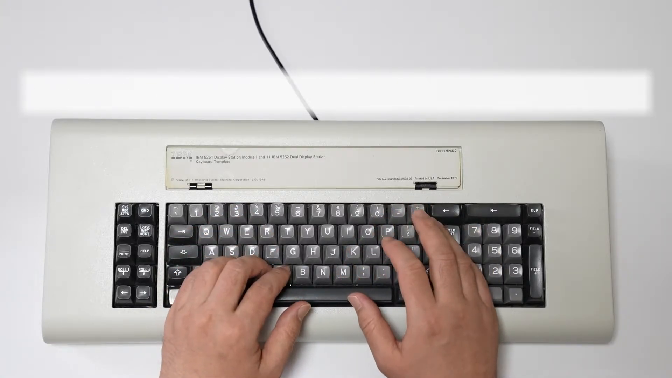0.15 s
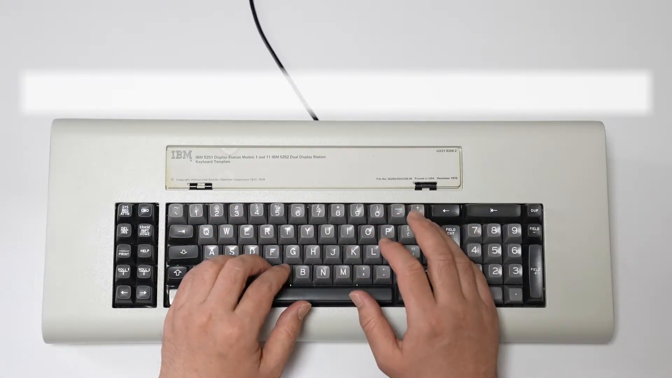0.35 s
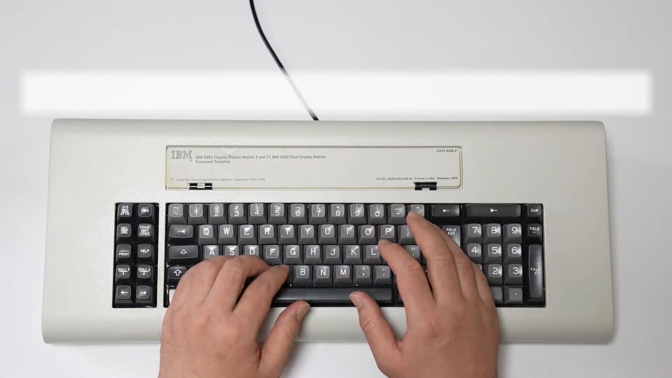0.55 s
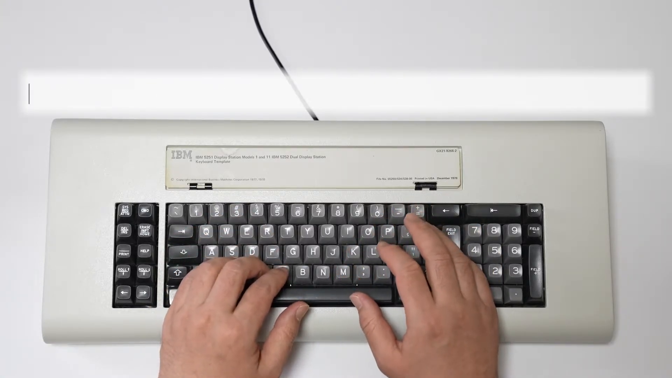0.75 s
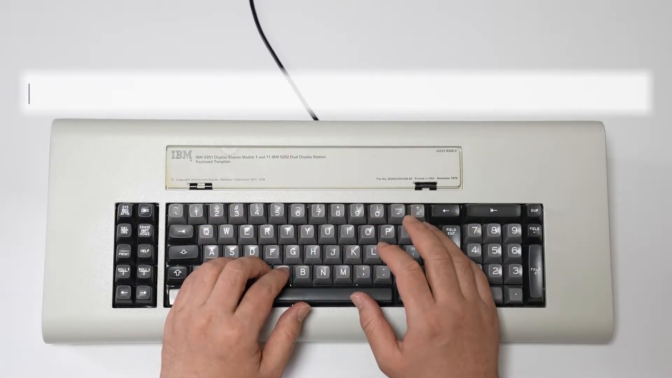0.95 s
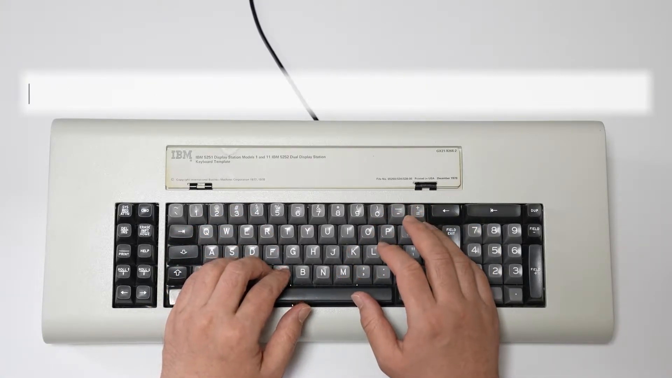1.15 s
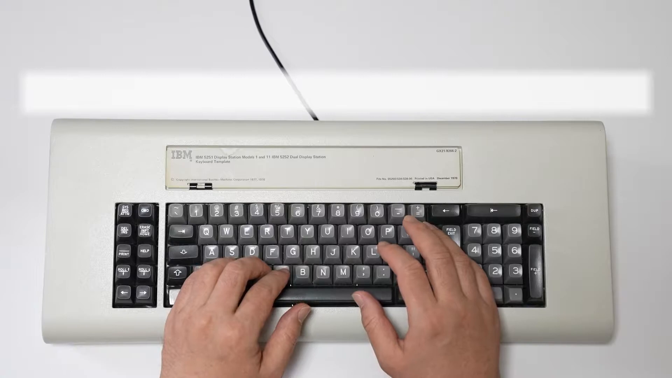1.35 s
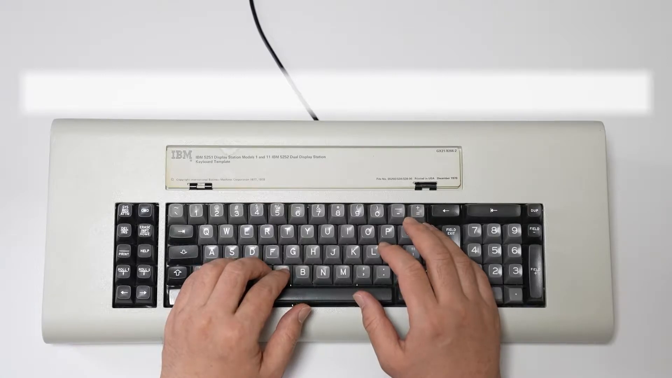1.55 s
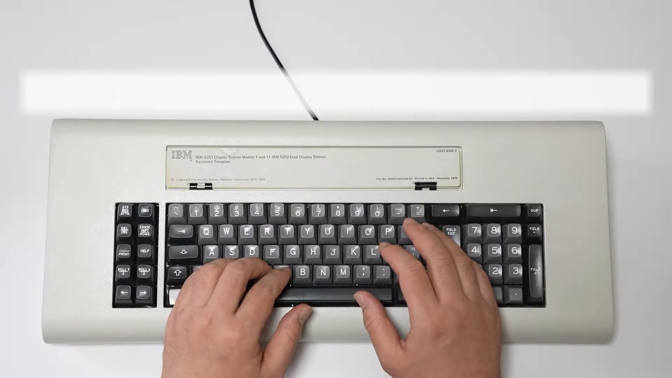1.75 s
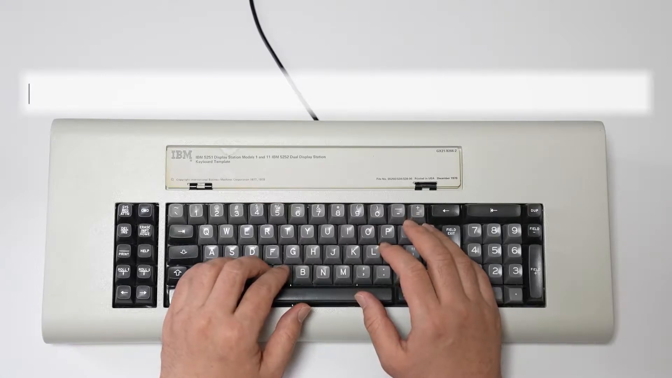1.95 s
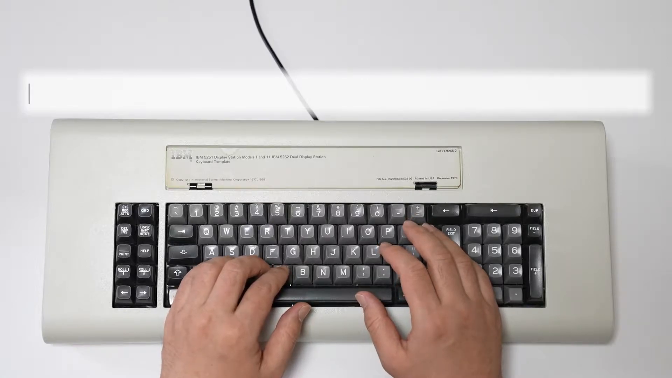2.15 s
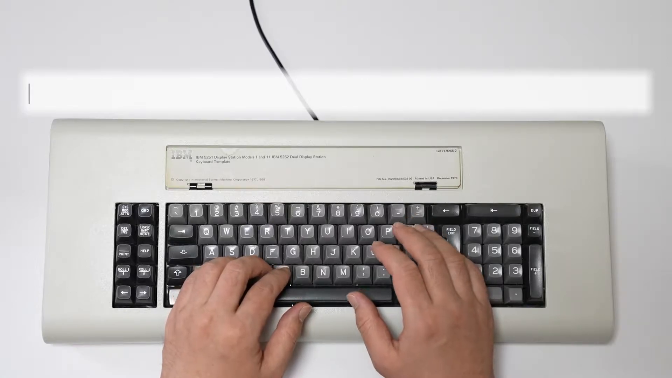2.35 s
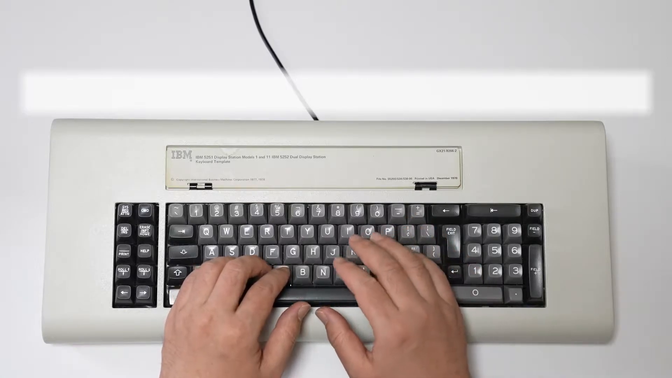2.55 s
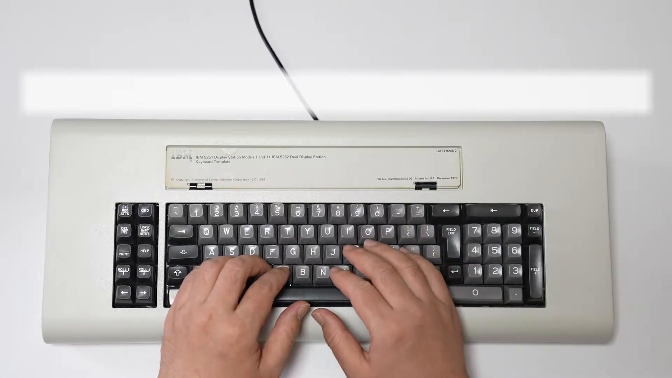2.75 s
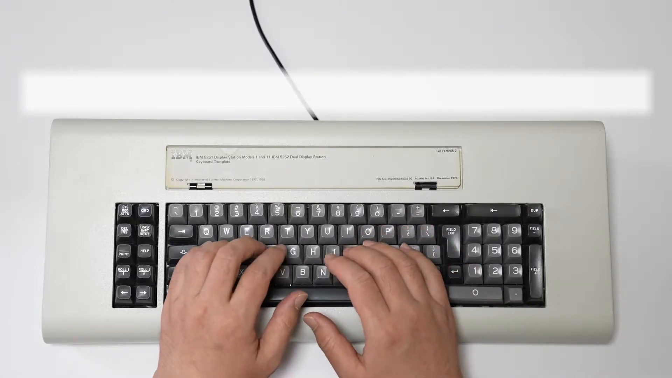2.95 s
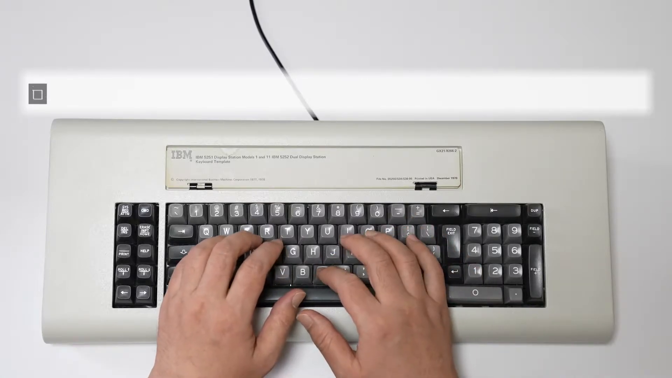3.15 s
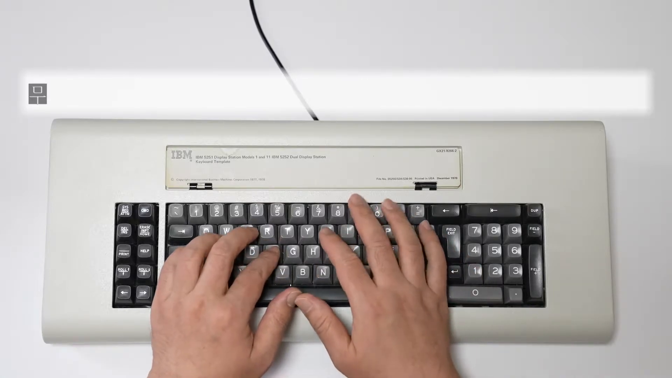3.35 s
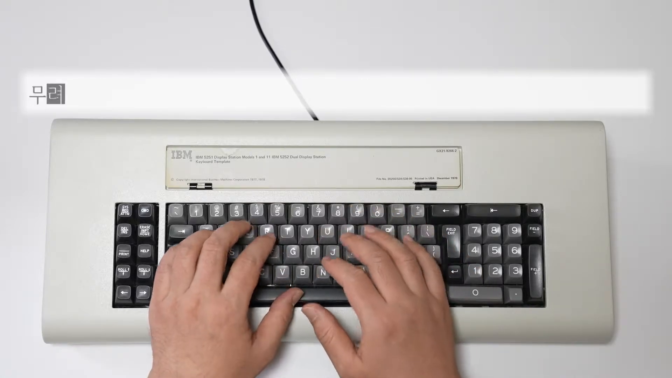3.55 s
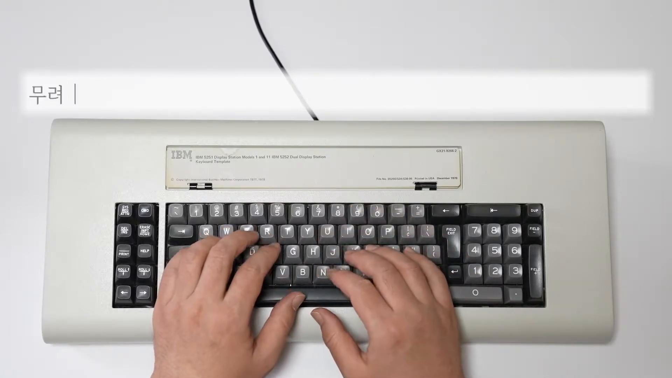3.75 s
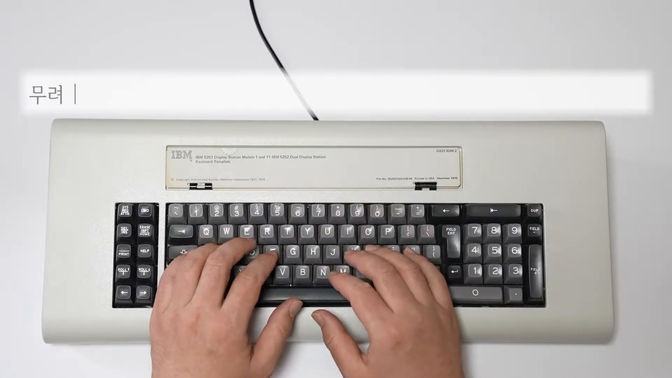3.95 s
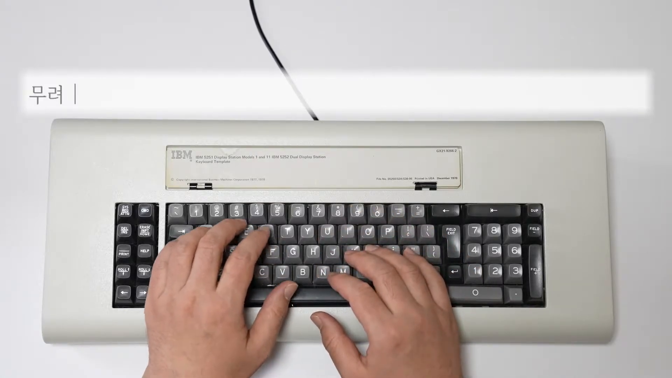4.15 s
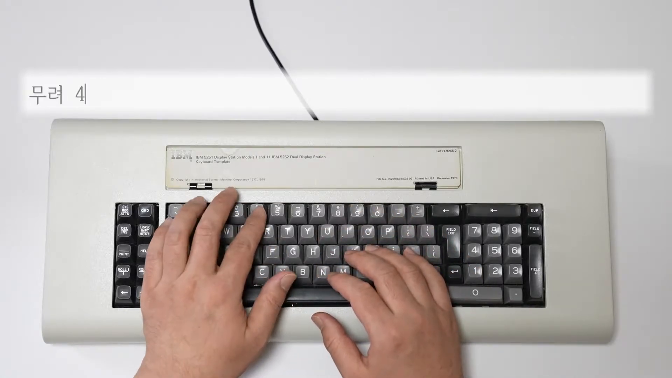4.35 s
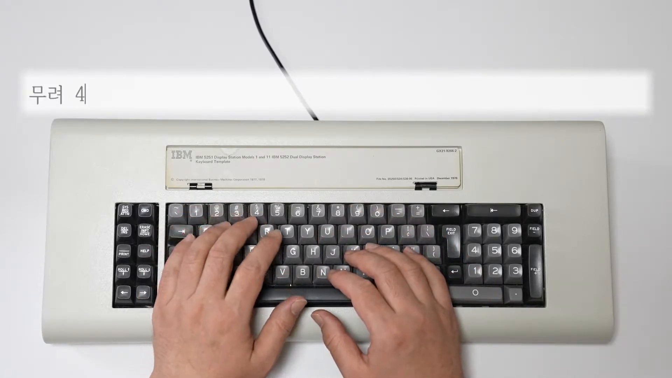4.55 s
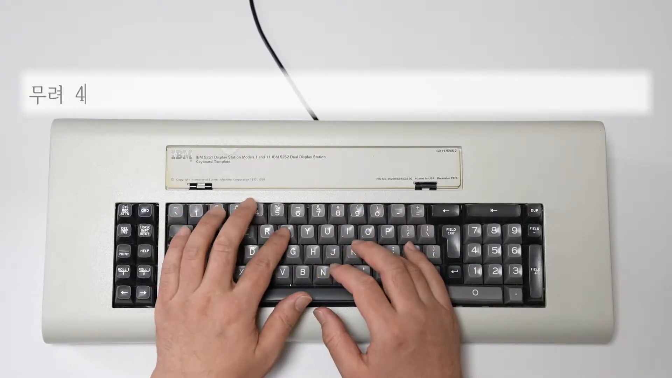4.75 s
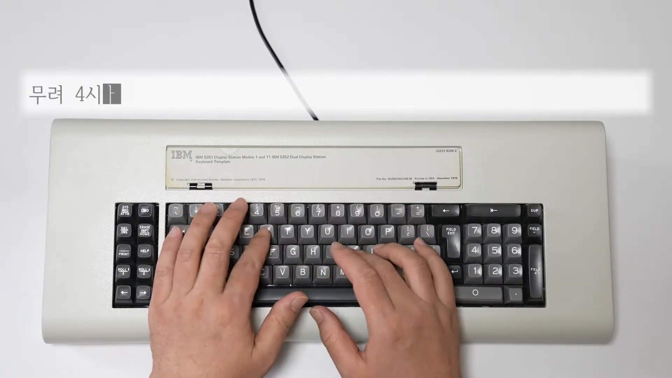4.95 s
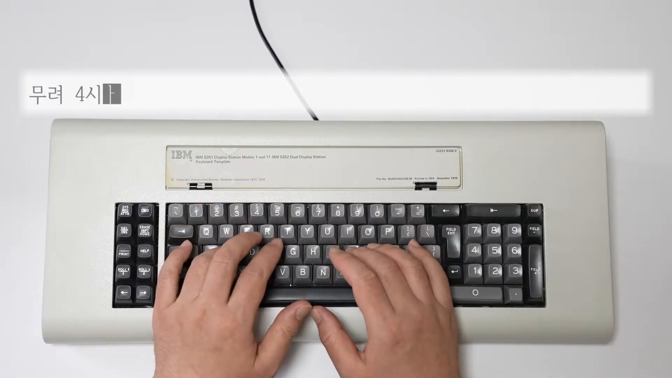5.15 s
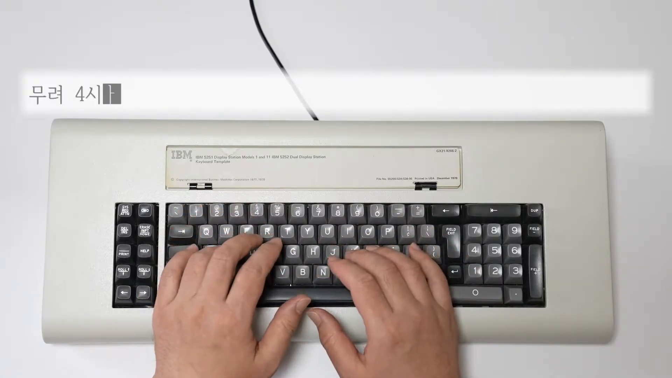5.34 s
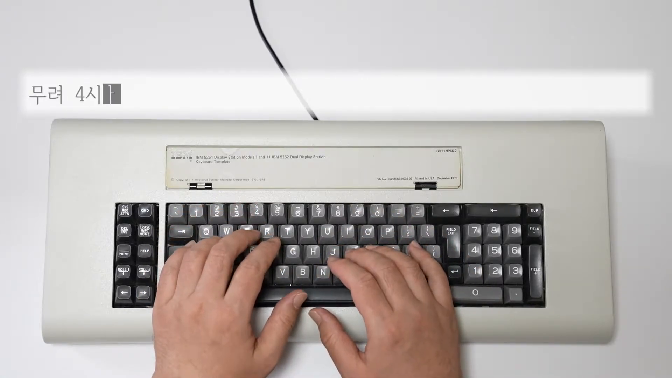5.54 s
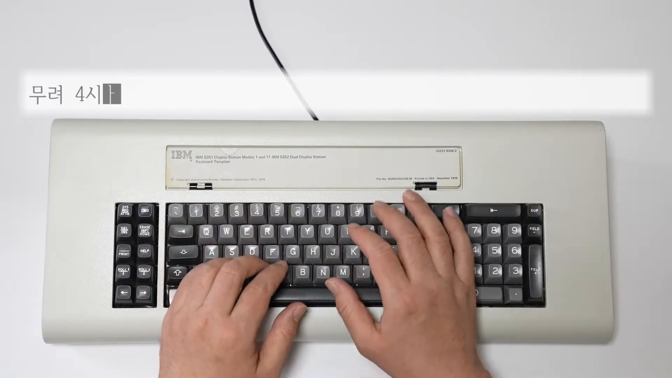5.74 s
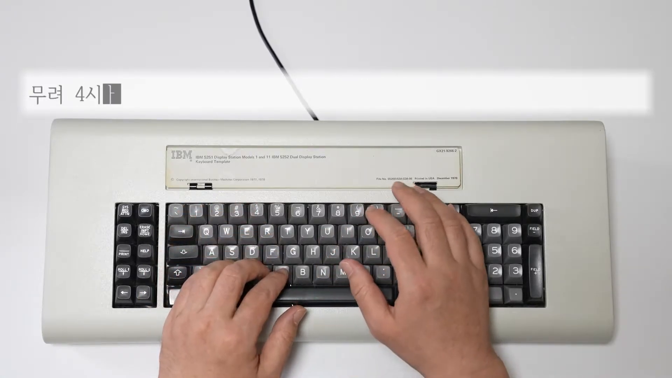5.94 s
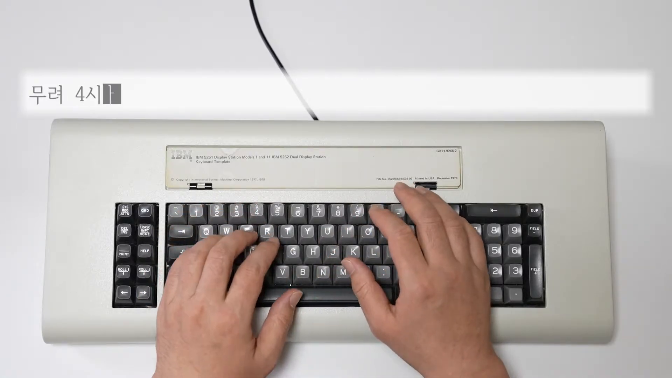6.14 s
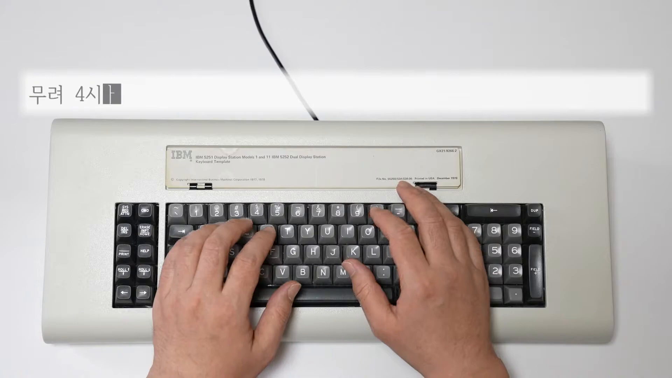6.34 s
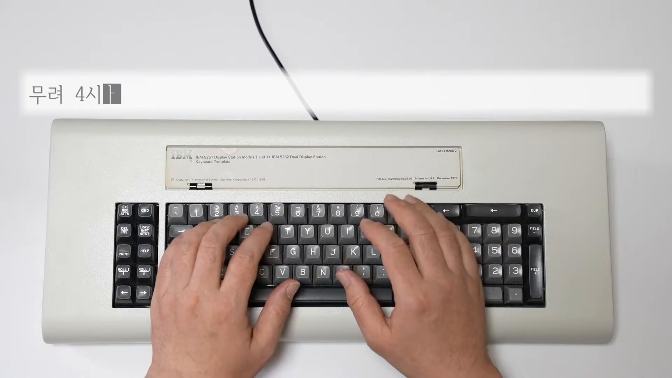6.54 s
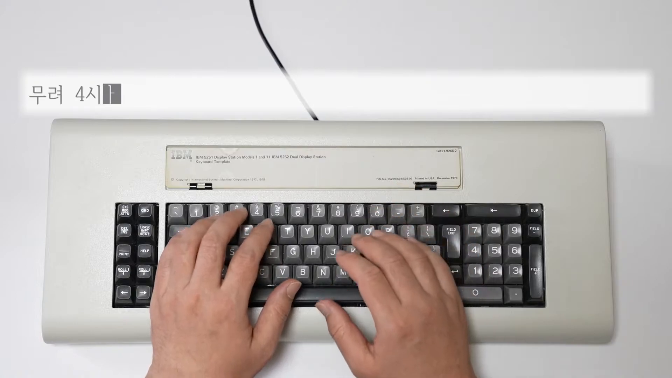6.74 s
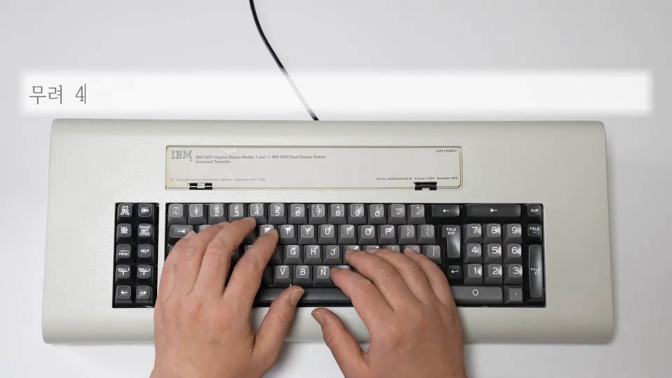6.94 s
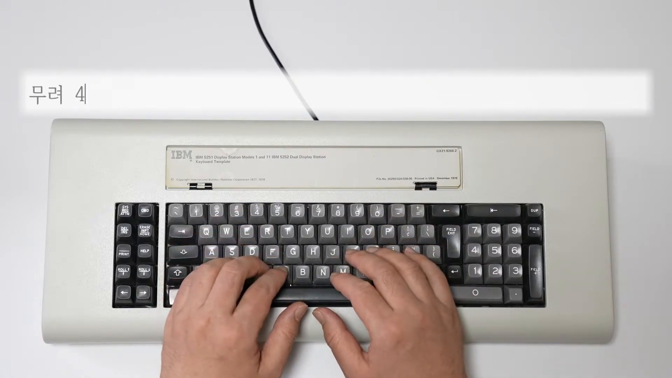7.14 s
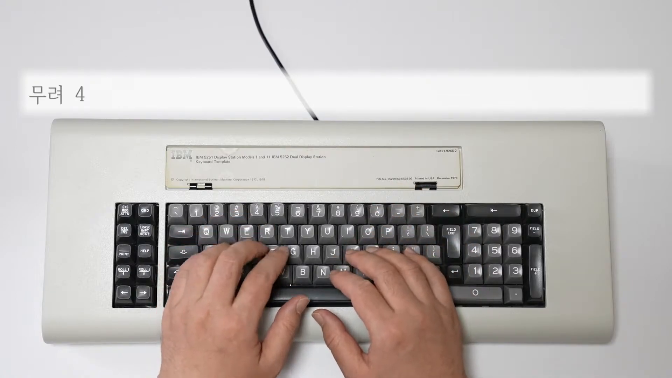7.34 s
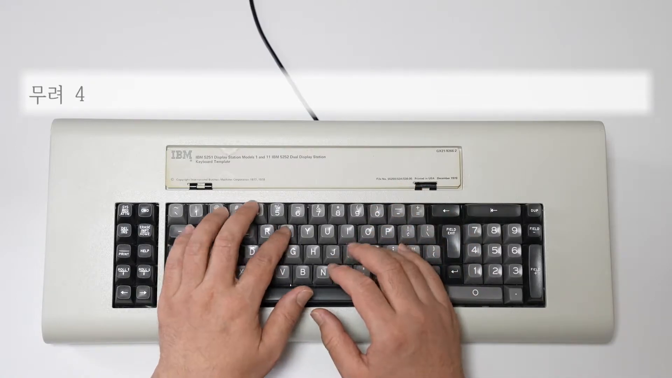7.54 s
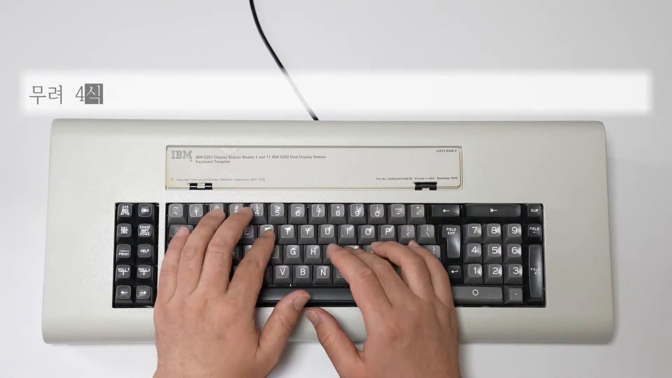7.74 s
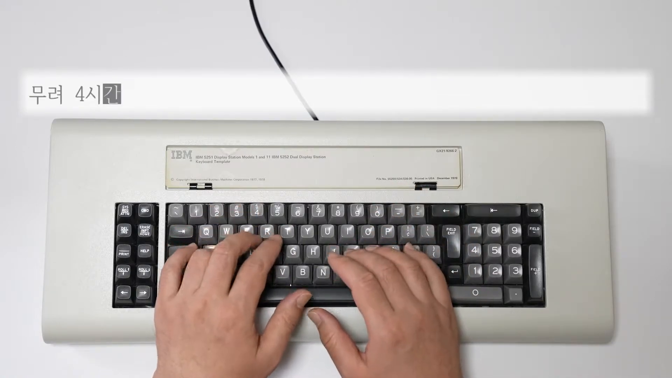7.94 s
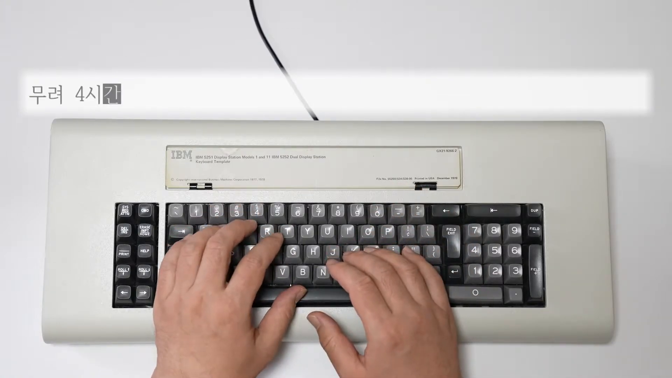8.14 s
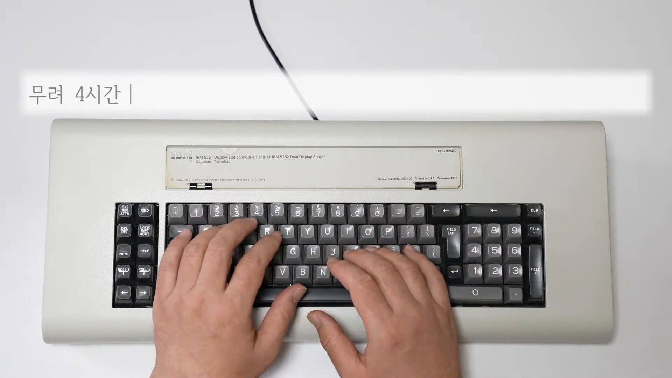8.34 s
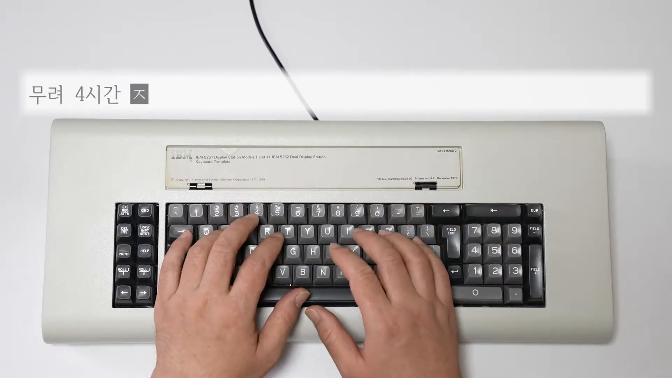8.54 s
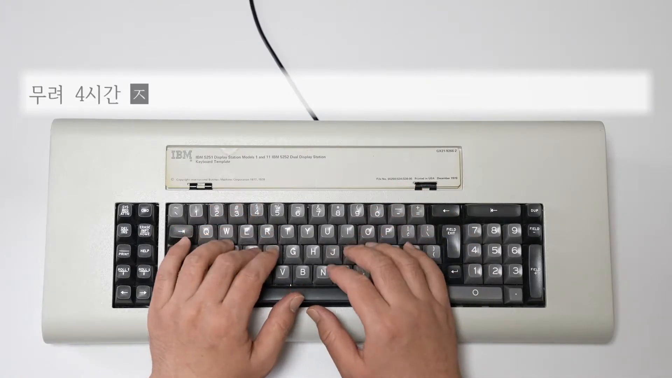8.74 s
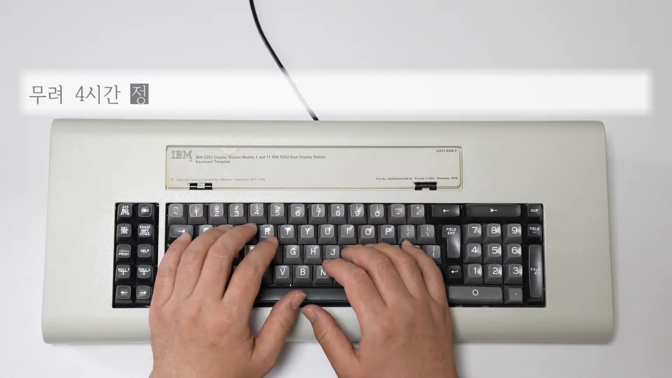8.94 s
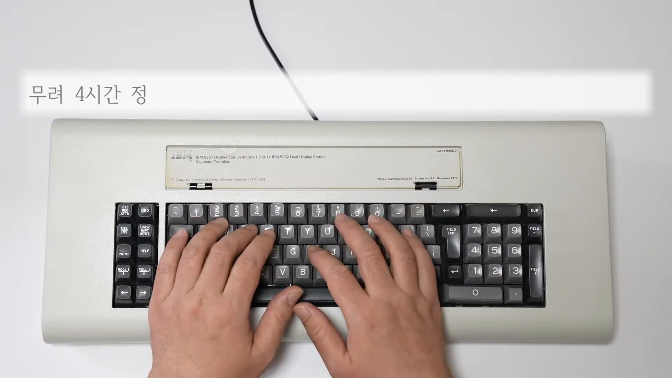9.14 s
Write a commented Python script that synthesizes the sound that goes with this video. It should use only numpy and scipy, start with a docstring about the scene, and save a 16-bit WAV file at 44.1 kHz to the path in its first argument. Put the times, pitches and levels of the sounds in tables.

```python
"""From the start a fan hisses and hums in a small quiet room, built from bands of noise and steady tones.
Distant engines drone outside: low tones with overtones that swell and fade at their own times.
Soon a heavy spring keyboard gives a first few knocks, each a rattle of tiny impacts ringing the case.
Some leave a thin spring tone ringing, and the desk and walls answer with a short tail of noise.
After a pause the typing returns in bursts, and a few heavy landings also rock the case in low tones."""
import sys
import numpy as np
from scipy import signal
from scipy.fft import rfft, irfft
from scipy.io import wavfile

SR = 44100
rng = np.random.default_rng(int(sys.argv[2]) if len(sys.argv) > 2 else 0)


def volts_from_decibels(level):
    """Turn decibel levels (scalar or array-like) into linear amplitude factors."""
    exponent = np.asarray(level, float) / 20
    return 10 ** exponent


def persist_wave(psi):
    """Save psi, clipped to +-1, as 16-bit WAV."""
    counts = np.round(np.clip(psi, -1, 1) * 32767).astype(np.int16)
    wavfile.write(sys.argv[1], SR, np.atleast_2d(counts).T)


N = 409688   # length in samples

# spectrum of the fan and outdoor hiss, before its overall level: pitch_hz, level_db (per Hz)
HISS_SPECTRUM = [(15, -32), (25, 1), (52, -6.5), (85, -10.5), (124, -13.5), (177, -15.5), (229, -13.5),
                 (404, -19), (763, -19.5), (839, -16.5), (1410, -27.5), (1660, -18), (2200, -28.5),
                 (3220, -38), (7000, -49.5), (9100, -63), (15400, -120)]
# overall loudness of the hiss: time_s, level_db
HISS_LEVEL = [(0, -48), (2.3, -46.5), (3, -46.5), (4.5, -47.5), (7, -49), (9.29, -48)]
# how alike the hiss is at left and right: pitch_hz, likeness (-1 opposite to 1 equal)
HISS_LIKENESS = [(60, -0.47), (240, 0.18), (950, 0.28), (3770, 0.43), (15000, 0.84)]
# mains hum tones, each level before its waver: pitch_hz, level_db
HUM_TONES = [(120, -64.5), (240, -69.5), (360, -68)]
# distant engines, before drift and overtone levels: loudest_s, pitch_hz, level_db,
# half_length_s (time from the loudest point down to 37 percent)
ENGINES = [(1.2, 43.95, -53, 2), (5.505, 58.5, -53.5, 1), (6.5, 38.02, -61, 3.6), (8.65, 59.6, -59.5, 0.48)]
# levels of the first three multiples of an engine's pitch: level_db
OVERTONE_DB = [1.5, -13.5, -14]
# contacts of key, spring and plate: start_s, strength_db, hardness_db (per step of TILT),
# plate_over_cap_db (per step of PLATE), loudest_ring_hz
CONTACTS = [(0.1435, -34, 0.3, 3.5, 1277), (0.1609, -46.5, 3.5, -5.5, 1280.0),
            (0.2128, -57.0, -4.9, 2, 860.0), (0.2804, -34.5, 0.7, -1.1, 2830),
            (3.0574, -44.5, -6, 1.2, 432), (3.082, -34, 2, 1, 1180), (3.1585, -45, -5, -4, 1250),
            (3.1731, -33, 2, 1, 1260), (3.2075, -33.5, -0.5, 0.5, 3120.0),
            (3.2494, -31, -1.7, -0.5, 2100.0), (3.2938, -64, -2.3, -4, 960.0), (3.324, -40.5, 6, 2.5, 826),
            (3.338, -31.5, 1.6, 0, 1233), (3.4215, -29.5, -2, -1.7, 436), (3.4543, -35, 2, 0.5, 450.0),
            (3.5276, -36, 0.9, -4.5, 3020), (3.5916, -46, 9, -13.5, 3120), (3.6116, -31.2, 3.1, 1, 1198),
            (3.6915, -51, 6, -3, 3320), (3.7057, -36.5, 1, -2, 1230), (4.3399, -40, -4.5, 6, 620),
            (4.3511, -38, 5, -1.5, 584), (4.443, -35.5, 3.6, -1.8, 415), (4.722, -48.5, -1, 0, 3450.0),
            (4.732, -29.5, -0.7, 0, 446), (4.7965, -43.5, 1.2, -5, 3490.0),
            (4.8182, -31.5, 1.9, -1.4, 1000.0), (4.8245, -32.5, 0, 0.5, 3030),
            (4.9052, -42.8, -1, 2, 960.0), (4.9107, -33.5, 0, -3, 3170), (4.9998, -38.3, -3.5, 0, 423),
            (5.0151, -33, 1, -2.5, 440), (5.1166, -33, 0.2, -2, 824), (5.1923, -42, -2, -4, 1260),
            (5.2483, -33, 1.8, 1, 812), (5.382, -33, -0.2, -0.3, 810), (5.8732, -46, -0.5, 1, 850.0),
            (5.8884, -34.5, 0, 0.5, 643), (5.9824, -34, 2.5, -1, 3080), (6.0346, -57, -10, 4, 950.0),
            (6.0667, -35.5, 1, 4, 2350), (6.181, -32.5, 1.3, -1.5, 1360), (6.3525, -47.5, -4, 6, 970),
            (6.3777, -33, -0.5, 5.8, 2100), (6.4961, -36, 1.9, -2, 830), (7.1688, -45.5, -4, 1.6, 1240),
            (7.1785, -41.5, -3, 0.5, 827), (7.529, -53, -1, 2.7, 850.0), (7.5389, -29, -1.2, 2.5, 417),
            (7.6132, -29.5, 1, -2.3, 2770), (7.6486, -31.5, 1, 0.5, 975), (7.7076, -31.5, -1.5, 0.5, 604),
            (7.7223, -36.5, 6.5, -2, 3230.0), (7.7859, -40.5, -1.5, -5, 1040.0), (7.7984, -29, -1, 1, 4150),
            (7.8912, -41.5, -1.5, -2.5, 424), (7.9134, -31, 1, 1.5, 463), (8.0722, -32.5, 0.3, 1, 643),
            (8.1272, -41.5, 7.5, -9, 3270.0), (8.1439, -30, 2, 1.5, 1190), (8.2316, -33.5, 2, -1.4, 4270),
            (8.493, -56.5, -4, 1.3, 875), (8.5053, -31, -0.8, 2, 630), (8.6337, -32, 2.8, -1.5, 1230),
            (8.6573, -30.5, 1.8, 0, 457), (8.7095, -53, 0, -5, 616), (8.767, -32, 1, -2, 590),
            (8.8012, -33, 1.5, -3, 880), (8.821, -46, 0.5, -10, 400.0), (8.919, -31.5, -1.2, -0.8, 887),
            (8.9372, -42.5, 0, 1, 920.0), (9.1376, -51.5, 0.9, -3, 750.0), (9.155, -31.0, 2.5, 2.5, 1353),
            (9.2011, -30, -2.0, -1.3, 600.0), (9.233, -33.5, 3.3, -1.5, 410.0)]
# four pitch zones, in order thud, knock, clack and snap: low_hz, high_hz
ZONES = [(250, 750), (750, 1800), (1800, 5500), (5500, 15500)]
# level of each zone in an average contact: level_db
ZONE_DB = [-0.5, -3, -1.5, -5]
# extra loss of each zone, so that the treble dies first: fade_db_per_s
ZONE_FADE_DB_PER_S = [4, 28, 19, 150]
# ringing modes of case and plate, before each key's own changes: pitch_hz, height_over_bare_crack_db
CASE_MODES = [(200, 23), (265, 0), (382, 16), (455, 14), (575, 13), (630, 4.5), (835, 17.5), (980, 2.5),
              (1120, 10.5), (1276, 15.5), (1420, -19), (1590, 4.5), (2090, 7.5), (2300, 5.5), (2880, 9),
              (3150, 5.5), (3550, -11), (4250, 0.5), (4800, -10.5), (6300, -13), (7500, -5), (8270, 5.5),
              (10600, 13.5), (11300, 4), (12400, 1)]
# springs left ringing, level before their swell: start_s, pitch_hz, level_db, t60_s (time to fall 60 dB)
SPRINGS = [(0.281, 856, -29, 0.3), (3.251, 969, -44, 1.2), (3.338, 595, -38, 1.2), (3.529, 896, -47, 1.2),
           (3.707, 359, -57, 1.2), (4.442, 351, -51, 1.2), (4.442, 994, -53, 0.45), (4.818, 926, -41, 1.2),
           (4.909, 1014, -47, 1.2), (5.016, 588, -45, 0.7), (5.248, 572, -40, 0.7), (5.382, 856, -46, 0.45),
           (6.181, 888, -45, 1.2), (6.377, 592, -52, 1.2), (6.496, 885, -51, 0.45), (7.538, 392, -47, 1.2),
           (7.913, 359, -48, 1.2), (8.505, 378, -44, 1.2), (8.656, 990, -45, 1.2), (8.8, 624, -42, 0.7),
           (8.919, 912, -46, 0.45), (9.201, 886, -36, 1.2)]
# heavy landings that rock the whole case on the desk, level of each tone before its swell: start_s, level_db
ROCKS = [(3.4215, -25), (4.732, -33), (7.539, -33.5), (7.7076, -30.5), (9.2016, -32)]

# by zone: a hard contact tilts upward; the plate sounds in knock and snap, the cap in thud and clack
TILT, PLATE = np.array([-1.5, -.5, .5, 1.5]), np.array([-1, 1, -1, 1])
HIT = int(.25 * SR)   # samples kept of each contact or rock
DAMPING = .95         # t60 in s = DAMPING / sqrt(Hz): higher modes die sooner
RATTLE_MS = 2.05      # time in which the blow falls to 37 percent
CHATTER_DB, CHATTER_T60_S = -6, 0.13
BOUNCES_PER_S, BOUNCE_DB = 250, 3     # how often the chatter changes loudness, and by how much
LOUDEST_DB, LOUDEST_ZONE_DB = 11, 3   # lift of the mode that a contact drives best, and of its zone
STROKE_S = .06        # contacts closer than this belong to the same stroke
ROOM_T60_S, ROOM_DB, ROOM_DULL_HZ = .22, -13, 7000
ROCK_T60_S = 0.14
MIC_NOISE_DB = -59.5  # before the treble cut


def rms_one(x):
    """Scale to an average strength (rms) of 1."""
    return x / np.sqrt(np.mean(x ** 2) + 1e-20)


def in_time(rows):
    """Draw lines between the rows of a table, giving each column one value per sample."""
    s, *columns = np.transpose(rows)
    return [np.interp(np.arange(N) / SR, s, column) for column in columns]


def at_hz(points, hz):
    """Read a spectrum on a log-frequency axis."""
    point_hz, value = np.transpose(points)
    return np.interp(np.log(hz), np.log(point_hz), value)


def band(x, low, high):
    """Keep only the pitches between low and high Hz."""
    return signal.sosfilt(signal.butter(2, [low, high], "band", fs=SR, output="sos"), x)


def drift(rate_hz):
    """Slow random wander of spread 1: smoothed noise, faster for a higher rate."""
    # made at one value per 40 samples; the first 2000 values let the filter settle
    r = np.exp(-80 * np.pi * rate_hz / SR)
    noise = rng.standard_normal(N // 40 + 2002)
    slow = signal.lfilter([1], [1, -2 * r, r * r], noise)[2000:]
    return np.interp(np.arange(N) / 40, np.arange(len(slow)), rms_one(slow))


def add(out, s, sound):
    """Mix a short sound in at time s."""
    i = round(s * SR)
    out[..., i:i + sound.shape[-1]] += sound[..., :N - i]


def hiss(patchy_db=2.0):
    """Quarter-octave bands of stereo noise, each with its own level, flicker and likeness."""
    out, edges = 0, 22 * 2 ** np.arange(0, 8.1, .25)
    white = rng.standard_normal((2, 2, N))
    for k, (low, high) in enumerate(zip(edges, edges[1:])):
        middle_hz = np.sqrt(low * high)
        mid, side = band(white[k % 2], low, high)   # neighbouring bands use different noise
        alike = np.clip(at_hz(HISS_LIKENESS, middle_hz), -1, 1)
        gain = volts_from_decibels(at_hz(HISS_SPECTRUM, middle_hz) + patchy_db * drift(5.0))
        stereo = np.sqrt(1 + alike) * mid + np.sqrt(1 - alike) * side * [[1], [-1]]
        out = out + gain * stereo
    return volts_from_decibels(in_time(HISS_LEVEL)[0]) * rms_one(out)


def hum(waver_db=1.5):
    """Faint, nearly steady sine tones on multiples of the mains frequency."""
    t, out = np.arange(N) / SR, 0
    for hz, level_db in HUM_TONES:
        level = np.sqrt(2) * volts_from_decibels(level_db + waver_db * drift(1.3))   # root 2 turns rms into peak
        out = out + level * np.sin(2 * np.pi * hz * t)
    return out


def drones(waver_db=0.5, side_db=2.0):
    """Engines: low tones at three multiples of a gently drifting pitch, partly opposite at left and right."""
    out, t = 0, np.arange(N) / SR
    for s, hz, level_db, half_s in ENGINES:
        phase = 2 * np.pi * np.cumsum(hz + 0.6 * drift(1.0)) / SR
        level = np.sqrt(2) * volts_from_decibels(level_db + waver_db * drift(2.6))
        swell = level * np.exp(-((t - s) / half_s) ** 2)
        for k, overtone_db in enumerate(OVERTONE_DB):
            mid = np.sin((k + 1) * phase)
            side = volts_from_decibels(side_db) * np.sin((k + 1) * phase + 1.2)
            out = out + swell * volts_from_decibels(overtone_db) * np.array([mid + side, mid - side])
    return out


def case_body(ring_hz, spread_db, detune):
    """Ringing of case and plate after one tiny impact; every contact couples to the modes in its own way."""
    t = np.arange(HIT) / SR
    hz, mode_db = np.transpose(CASE_MODES)
    t60 = DAMPING / np.sqrt(hz[:, None])
    chance = rng.standard_normal((2, len(hz)))
    best = np.arange(len(hz)) == np.argmin(abs(hz - ring_hz))
    pitch_hz = np.where(best, ring_hz, hz * (1 + detune * chance[0]))
    phase = 2 * np.pi * np.outer(pitch_hz, t)
    # the last factor gives slow and fast fading modes the same height in the spectrum
    rings = np.cos(phase) * volts_from_decibels(-60 * t / t60) * 2 * np.log(1000) / (SR * t60)
    body = volts_from_decibels(mode_db + np.where(best, LOUDEST_DB, spread_db * chance[1])) @ rings
    body[0] += 1   # bare crack of plastic on plastic
    return body


def impact_rattle(tick_db, rise_s):
    """The blow as a short burst of random impacts, then loose parts chattering on in uneven bounces."""
    t = np.arange(HIT) / SR
    blow = np.exp(-1000 * t / RATTLE_MS) * (1 - 0.5 * np.exp(-t / rise_s))
    bounces = volts_from_decibels(BOUNCE_DB * rng.standard_normal(HIT))[(t * BOUNCES_PER_S).astype(int)]
    chatter = bounces * volts_from_decibels(CHATTER_DB - 60 * t / CHATTER_T60_S)
    impacts = rng.standard_normal((2, HIT)) * np.sqrt(rng.exponential(1, HIT))   # mid, side
    rattle = impacts * (blow + chatter)
    rattle[0, 0] = volts_from_decibels(tick_db)   # first touch
    return rattle


def keys(spread_db=5.0, detune=0.032, tick_db=11.0, side_db=-7.0, side_hz=3720.0, low_hz=268.0, rise_s=0.0017):
    """Each contact's rattle strikes the case modes, then each pitch zone gets its own level and fade."""
    out, t = np.zeros((2, N)), np.arange(HIT) / SR
    for s, level_db, hard_db, plate_db, ring_hz in CONTACTS:
        lift_db = [LOUDEST_ZONE_DB * (low <= ring_hz < high) for low, high in ZONES]
        zone_db = level_db + hard_db * TILT + plate_db * PLATE + ZONE_DB + lift_db
        body = case_body(ring_hz, spread_db, detune)
        rattle = impact_rattle(tick_db, rise_s)
        # convolution: every tiny impact sets the whole body ringing
        struck = irfft(rfft(body, 2 * HIT) * rfft(rattle, 2 * HIT))[:, :HIT]
        for k, (low, high) in enumerate(ZONES):
            sign = (-1) ** k   # lets neighbouring zones join without a notch
            part = band(struck, low, high) * sign * volts_from_decibels(-ZONE_FADE_DB_PER_S[k] * t)
            first_10_ms = part[0, :SR // 100]
            add(out, s, volts_from_decibels(zone_db[k]) * part / np.std(first_10_ms))
    mid, side = signal.sosfilt(signal.butter(4, low_hz, "high", fs=SR, output="sos"), out)
    # stereo width: mostly in the treble, with a little at all pitches
    side_treble = signal.lfilter(*signal.butter(1, side_hz, "high", fs=SR), side)
    side = volts_from_decibels(side_db) * side_treble + 0.12 * side
    return np.array([mid + side, mid - side])


def room(x, rise_s=0.0089):
    """Desk and walls return a dense noise tail that dies fast, different in each ear."""
    t = np.arange(SR // 2) / SR
    tail = rng.standard_normal((2, len(t))) * volts_from_decibels(-60 * t / ROOM_T60_S) * (1 - np.exp(-t / rise_s))
    mid, side = signal.sosfilt(signal.butter(1, ROOM_DULL_HZ, fs=SR, output="sos"), tail)
    tail = mid + 0.72 * side * np.array([[1], [-1]])
    tail = tail / np.sqrt(np.sum(tail[0] ** 2))
    return volts_from_decibels(ROOM_DB) * signal.fftconvolve(x, tail, axes=1)[:, :N]


def springs(rise_s=0.0012, stop_s=0.0027):
    """Thin sine tones swell in and fade, for at most 1 s, until the next stroke damps them."""
    out, t = np.zeros(N), np.arange(SR) / SR
    touches = np.append(np.transpose(CONTACTS)[0], np.inf)
    for s, hz, level_db, t60 in SPRINGS:
        length = touches[touches > s + STROKE_S][0] - s
        damped = np.exp(-np.maximum(t - length, 0) / stop_s)
        envelope = volts_from_decibels(level_db - 60 * t / t60) * (1 - np.exp(-t / rise_s)) * damped
        add(out, s, envelope * np.sin(2 * np.pi * hz * t))
    return out


def rocking(rise_s=0.0013):
    """After a heavy landing, three strong low case modes go on beating against each other."""
    out, t = np.zeros(N), np.arange(HIT) / SR
    beat = sum(np.sin(2 * np.pi * hz * t) for hz, _ in CASE_MODES[2:5])
    for s, level_db in ROCKS:
        add(out, s, volts_from_decibels(level_db - 60 * t / ROCK_T60_S) * (1 - np.exp(-t / rise_s)) * beat)
    return out


def scene():
    """Background, and the keyboard a little to the right with its room tail."""
    background = hiss() + hum() + drones()
    pan = volts_from_decibels(np.array([[-.4], [.4]]))   # dB at left, right
    board = (keys() + rocking()) * pan
    return background + board + room(board) + springs() * pan


def top_cut(x):
    """Nothing passes above the cut-off."""
    return signal.sosfilt(signal.butter(12, 16820, fs=SR, output="sos"), x)


def record(dry, top_hz=16250.0):
    """The microphone adds its own white hiss, and a steep filter cuts the top of the treble."""
    noisy = dry + volts_from_decibels(MIC_NOISE_DB) * rng.standard_normal(dry.shape)
    heard = signal.sosfilt(signal.cheby2(12, 50, top_hz, fs=SR, output="sos"), noisy)
    return top_cut(heard)


dry = scene()
out = record(dry)
persist_wave(out)
```